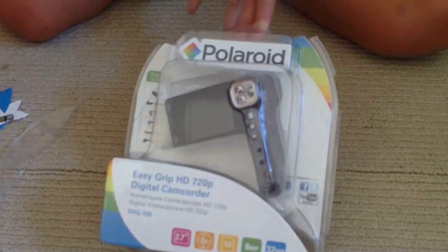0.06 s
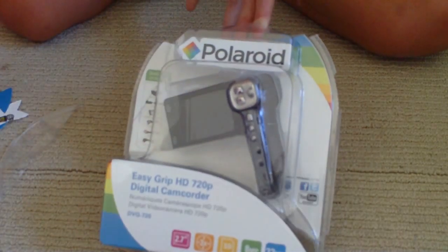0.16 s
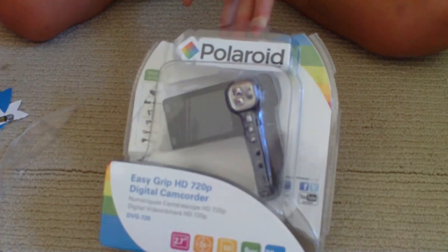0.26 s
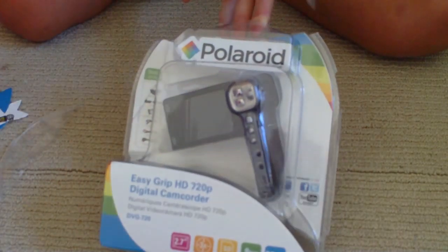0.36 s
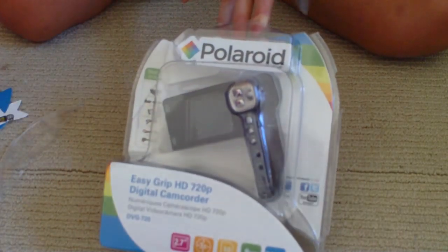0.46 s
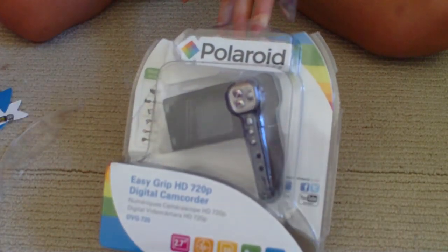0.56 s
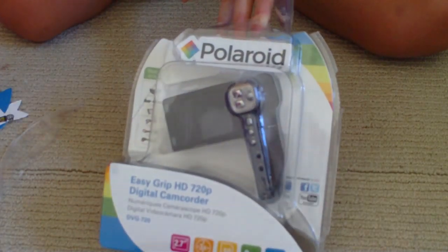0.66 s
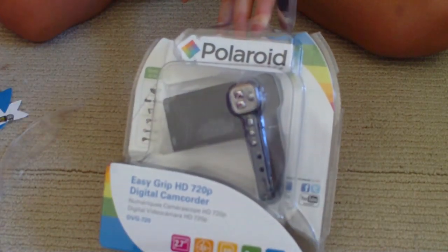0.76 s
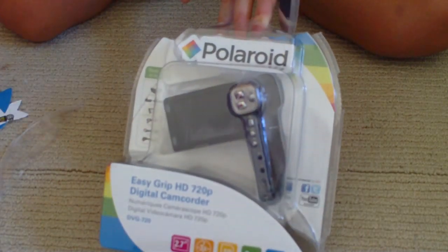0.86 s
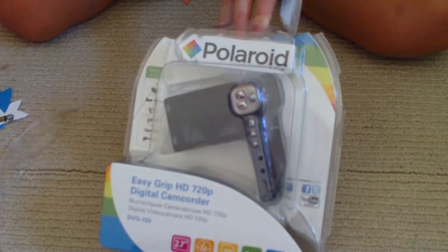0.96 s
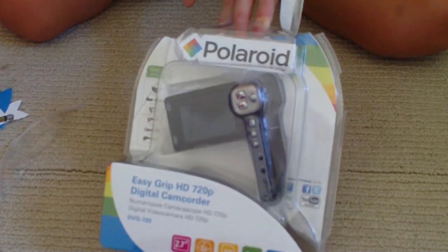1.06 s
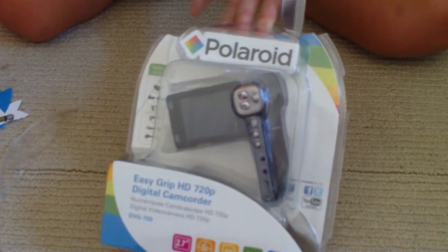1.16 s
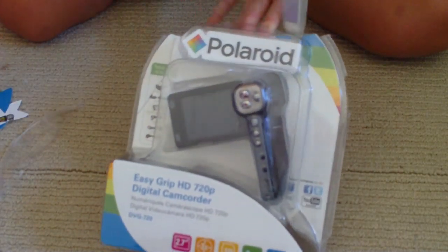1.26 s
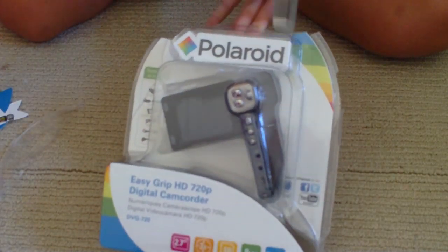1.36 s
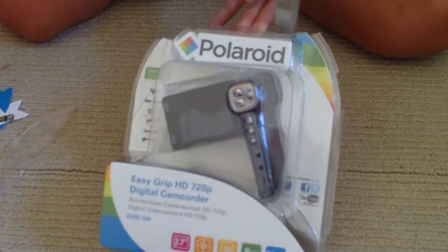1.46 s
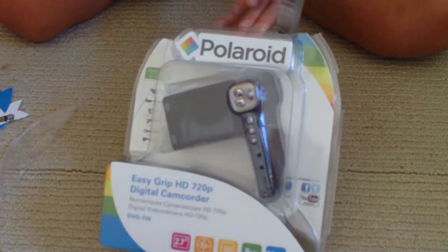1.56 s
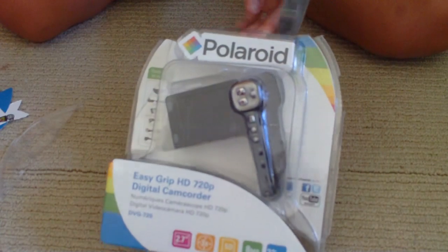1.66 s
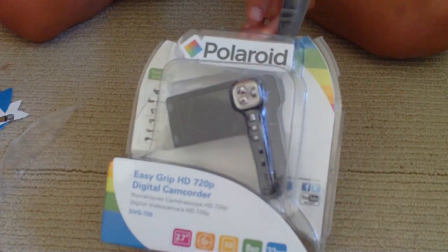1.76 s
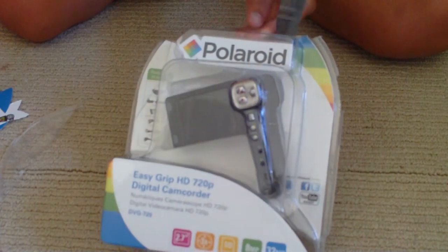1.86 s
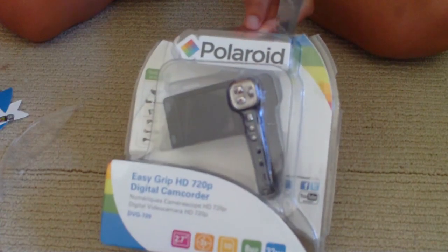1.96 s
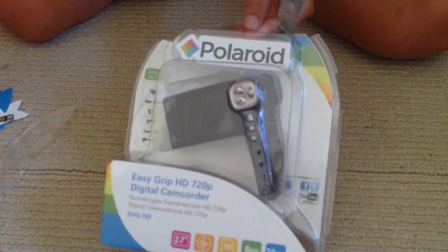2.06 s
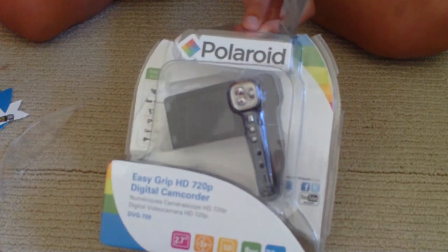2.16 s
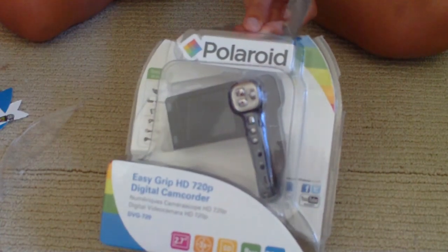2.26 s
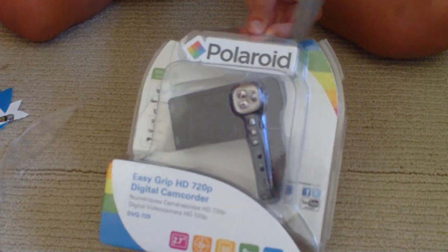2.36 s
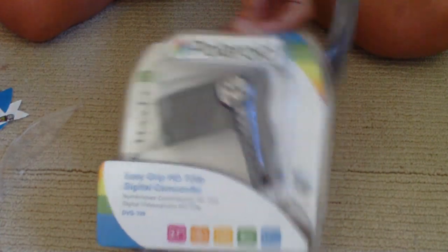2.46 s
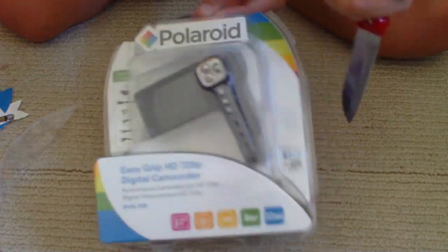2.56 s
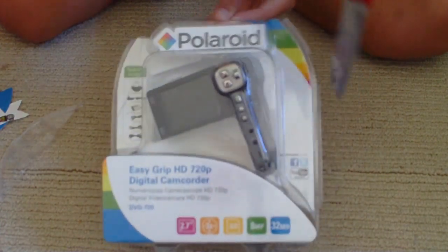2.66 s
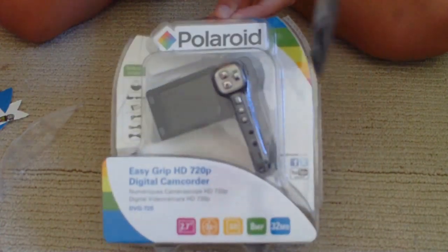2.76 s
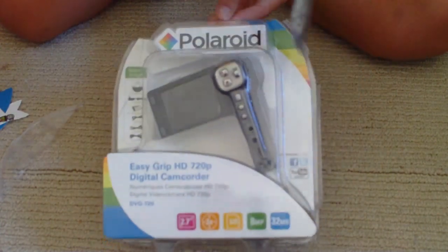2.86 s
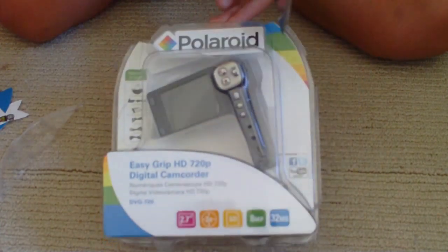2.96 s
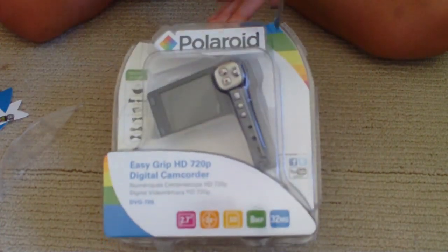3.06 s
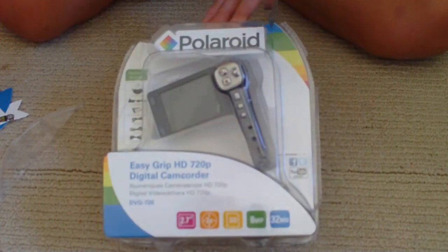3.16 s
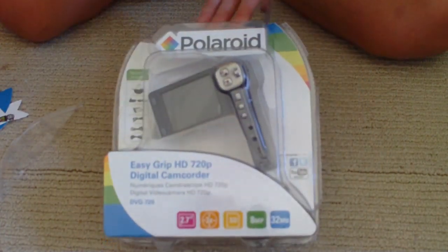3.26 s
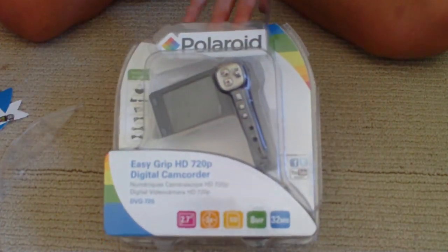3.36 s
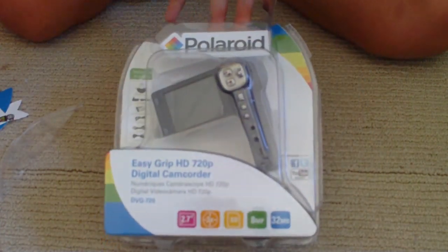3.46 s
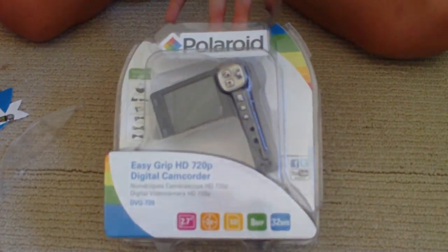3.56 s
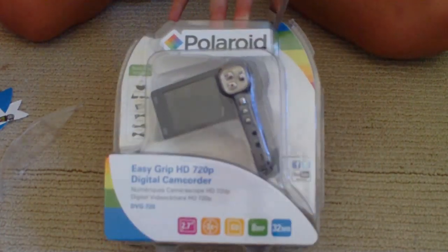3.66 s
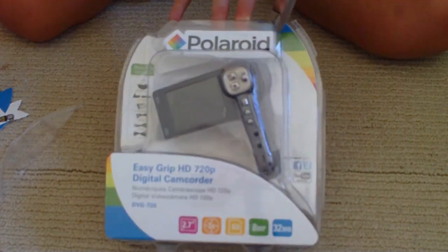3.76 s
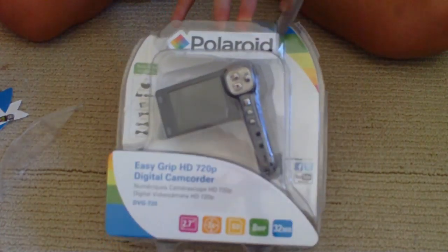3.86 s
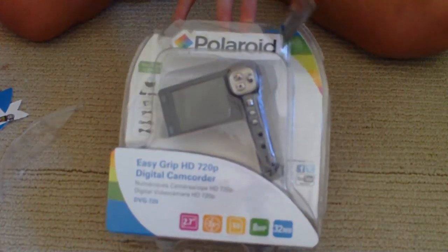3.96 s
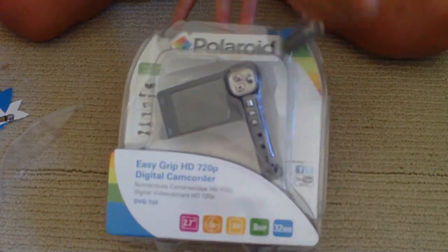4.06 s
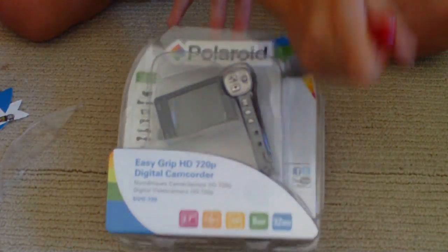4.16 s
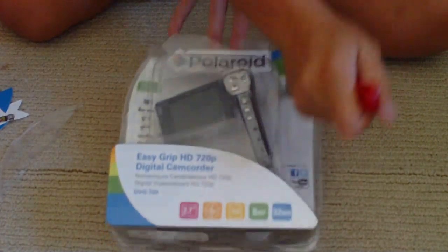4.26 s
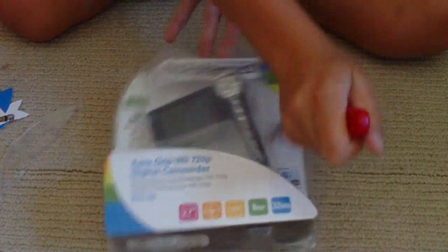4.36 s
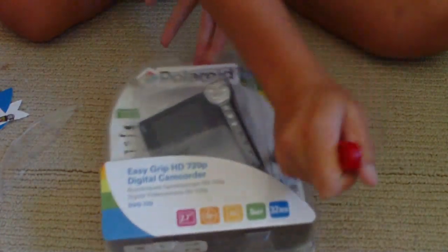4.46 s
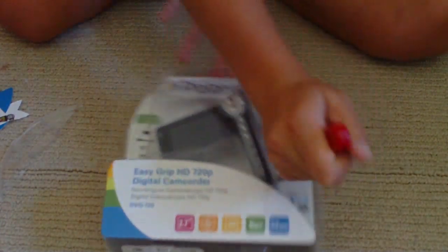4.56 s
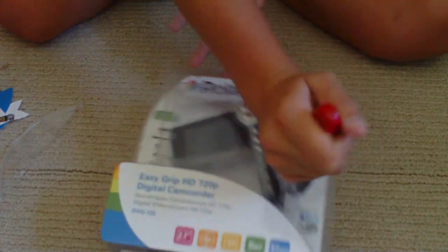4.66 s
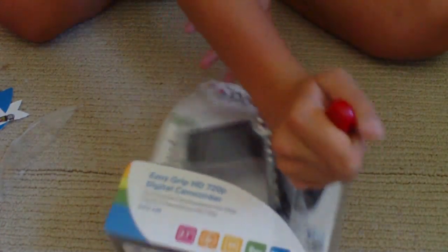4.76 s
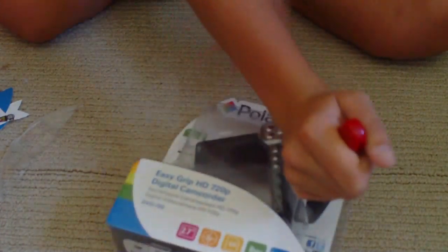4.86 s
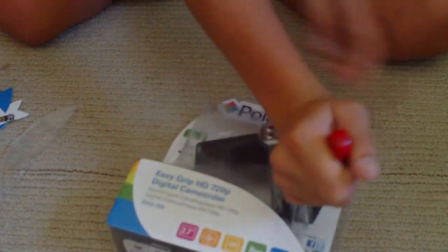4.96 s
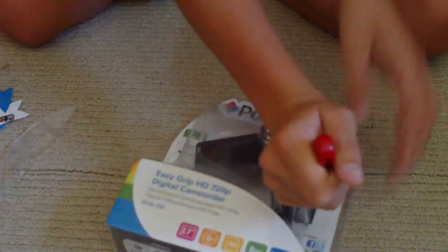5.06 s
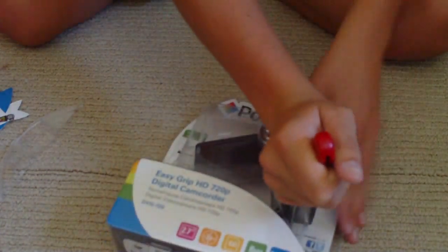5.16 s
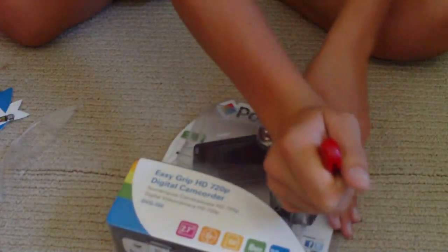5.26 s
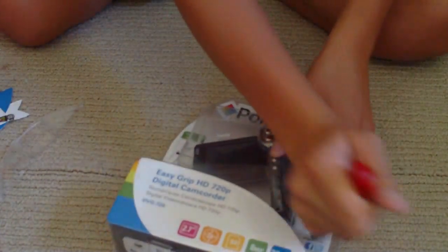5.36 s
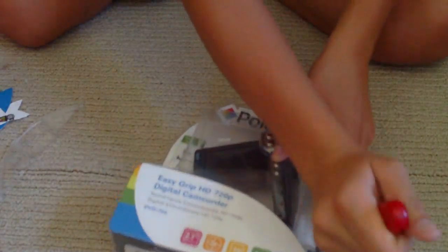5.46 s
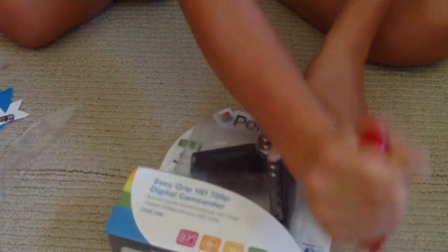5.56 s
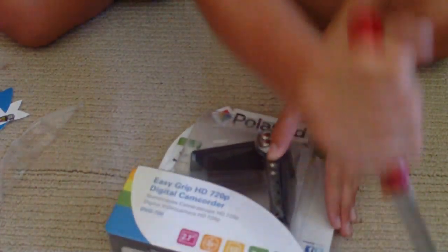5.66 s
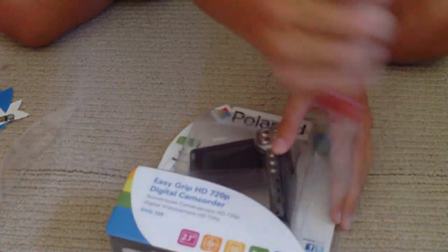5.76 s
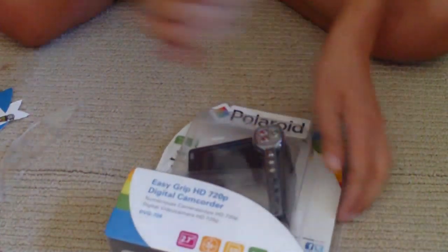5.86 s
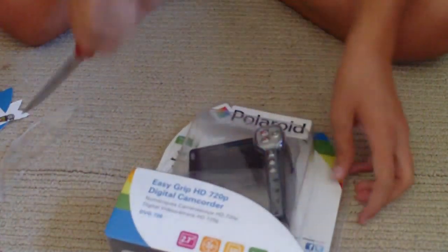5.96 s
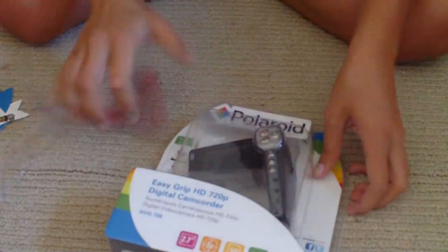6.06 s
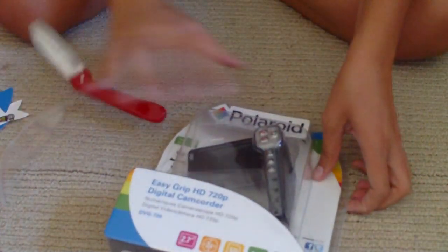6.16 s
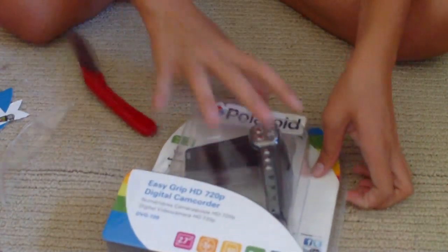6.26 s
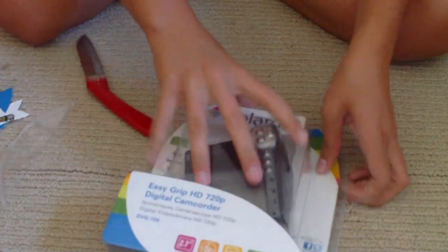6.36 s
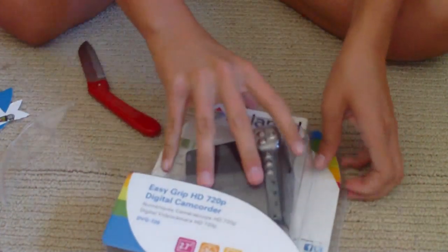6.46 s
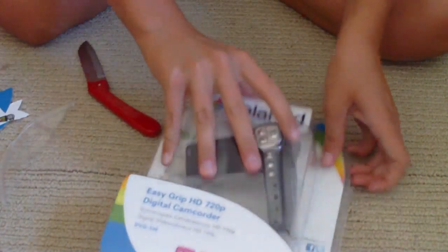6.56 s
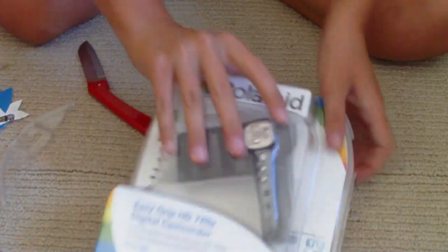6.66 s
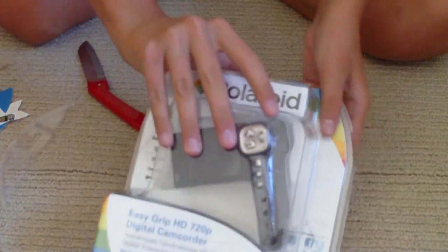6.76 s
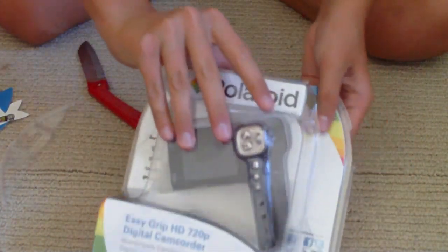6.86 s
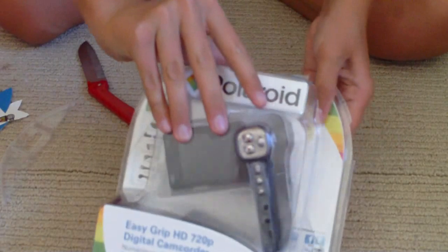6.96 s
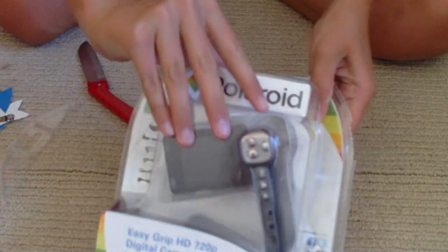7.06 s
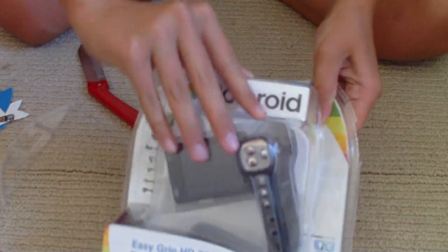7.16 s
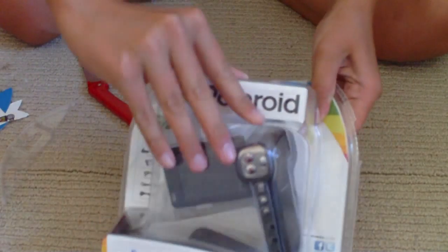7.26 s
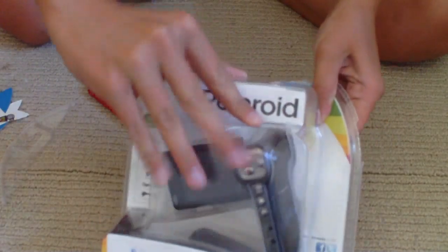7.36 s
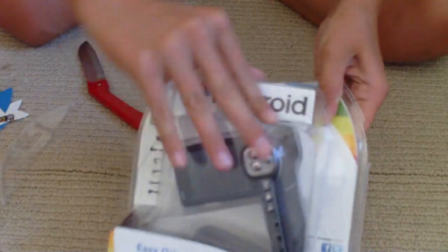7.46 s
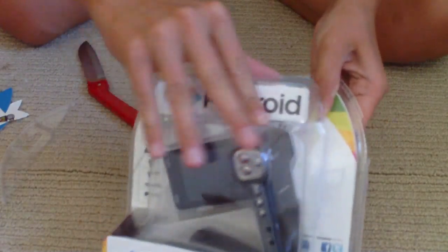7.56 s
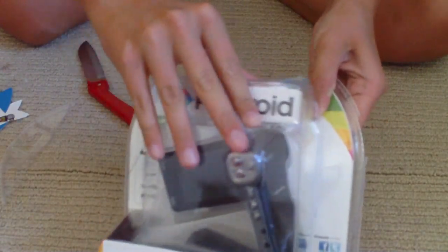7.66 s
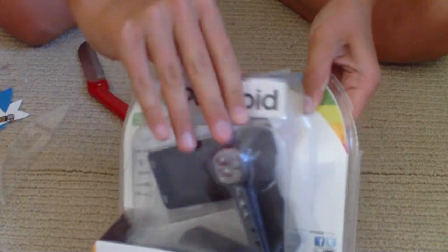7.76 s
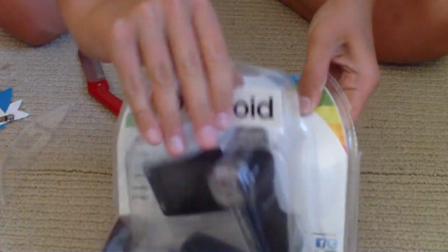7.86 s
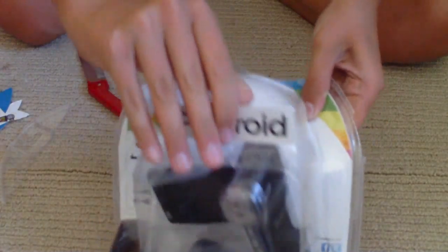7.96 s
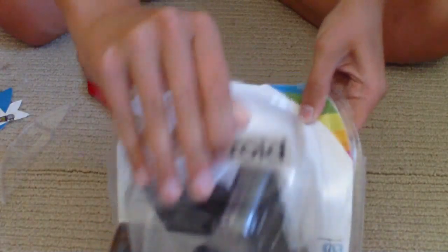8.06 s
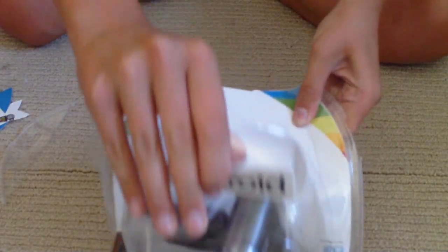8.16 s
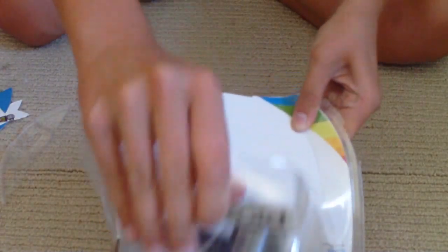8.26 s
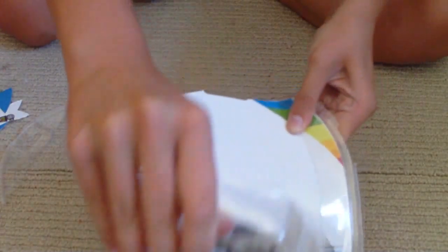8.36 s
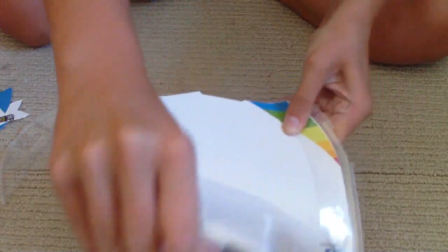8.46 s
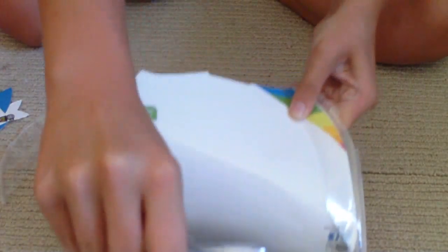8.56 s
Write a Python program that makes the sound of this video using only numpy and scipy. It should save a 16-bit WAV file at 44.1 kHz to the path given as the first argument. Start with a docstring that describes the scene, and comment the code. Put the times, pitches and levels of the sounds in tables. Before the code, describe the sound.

Over faint hiss, fingers rub and tick on a stiff plastic shell. A cluster of loud hollow snaps breaks out, then quiet; a knife rasps and one very hard crack follows. Smaller clicks and crinkles continue, thickening into a crowded run of sharp snaps as the pack is pulled open. Dull carpet thuds sit underneath. Small room, close microphone, slightly overloaded on the loudest hits.

```python
"""Hands rub and tick over stiff plastic above faint hiss; then the blister pack buckles in uneven snaps. Folds
are shaped noise bursts plus ringing shell modes; rubbing and creaks are stick-slip noise. Carpet thuds are low
noise bursts, popping panels single decaying notes; from 4 s knife and cut edges rasp. A small room answers
folds and friction; the loudest snaps flatten at full level."""
import sys
import numpy as np
from scipy import signal
from scipy.fft import rfft, irfft, next_fast_len
from scipy.io import wavfile

SR = 44100
rng = np.random.default_rng(int(sys.argv[2]) if len(sys.argv) > 2 else 0)


def wav_record(signal):
    """Record a signal, one row per channel, as 16-bit PCM in the file named by sys.argv[1]."""
    frames = np.transpose(np.atleast_2d(signal))
    bounded = np.clip(frames, -1, 1)
    # unit amplitude maps onto the largest positive 16-bit level
    quanta = np.round(bounded * 32767).astype(np.int16)
    wavfile.write(sys.argv[1], SR, quanta)


N = 379260
TIME = np.arange(N) / SR
AGE = np.arange(SR // 3) / SR  # time since a blow [s]
SHORT = SR // 50  # 20 ms in samples


def amp(db):
    """Decibels to gain."""
    return 10 ** (np.asarray(db) / 20)


def unit(x):
    """x at rms 1."""
    return x / np.sqrt(np.mean(x ** 2) + 1e-20)


def along(points, hz):
    """(frequency [Hz], value) points read on a log axis."""
    f, v = np.transpose(points)
    return np.interp(np.log(hz + 1), np.log(f + 1), v)


def level(rows):
    """A gain for every sample from (time [s], level [dB]) rows."""
    return amp(np.interp(TIME, *np.transpose(rows)))


def fade(t60_s, t=AGE):
    """Exponential decay, 60 dB down at t60_s."""
    return np.exp(-np.log(1000) * t / np.maximum(t60_s, 1e-3))


def add(track, s, sound):
    """Mix a sound into the track at s seconds."""
    room_left = track[max(round(s * SR), 0):][:len(sound)]
    room_left += sound[:len(room_left)]


def coloured(x, points, size=4096):
    """Minimum-phase filter with the gain of (frequency [Hz], gain [dB]) points."""
    gain = amp(along(points, np.fft.rfftfreq(size, 1 / SR)))
    cepstrum = irfft(np.log(gain))
    cepstrum[1:size // 2] *= 2  # fold to the causal half
    cepstrum[size // 2 + 1:] = 0
    impulse = irfft(np.exp(rfft(cepstrum)))
    return signal.fftconvolve(x, impulse)[:len(x)]


def around(x, hz, ratio=np.sqrt(2)):
    """Band-pass from hz / ratio to hz * ratio; one octave by default."""
    sections = signal.butter(2, [hz / ratio, hz * ratio], "band", fs=SR, output="sos")
    return signal.sosfilt(sections, x)


def stick_slip(slips_per_s, spread_db, grain_t60_s):
    """Tiny slips at random moments and of uneven size, each a short noise burst."""
    sizes = amp(spread_db * np.minimum(rng.standard_normal(N), 2))
    slips = (rng.random(N) < slips_per_s / SR) * sizes
    power = signal.fftconvolve(slips ** 2, fade(grain_t60_s) ** 2)[:N]
    return np.sqrt(np.abs(power)) * rng.standard_normal(N)


# room decay: (frequency [Hz], t60 [s])
ROOM_DECAY = [(150, 0.22), (400, 0.24), (1000, 0.18), (3000, 0.19), (10000, 0.2)]


def reverberate(x, wet_db, buildup_s=0.0038):
    """x plus a fresh random room tail whose decay time depends on frequency."""
    hz, t, z = signal.stft(rng.standard_normal(len(AGE)), SR, nperseg=256)
    decay = fade(along(ROOM_DECAY, hz)[:, None], t)
    tail = signal.istft(z * decay, SR, nperseg=256)[1][:len(AGE)]
    tail *= 1 - np.exp(-(AGE / buildup_s) ** 2)
    return x + amp(wet_db) * signal.fftconvolve(x, tail / np.linalg.norm(tail))[:len(x)]


# background: (time [s], level [dB])
HISS_LEVEL = [(0, -58), (2.3, -53), (2.8, -59), (4.6, -57.5), (5.05, -60), (8.6, -55)]
# its spectrum: (frequency [Hz], gain [dB])
HISS_COLOUR = [(15, -23), (25, -12), (107, -9.5), (173, -9.5), (254, -4.5), (401, -10.5), (518, -2),
               (559, -4.5), (1110, -9.5), (1670, -9.5), (3000, -12.5), (7700, -11), (11000, -17),
               (14300, -26), (22000, -120)]


def background():
    """Room tone and microphone hiss: coloured noise, slowly swelling and sinking."""
    return level(HISS_LEVEL) * unit(coloured(rng.standard_normal(N), HISS_COLOUR))


# hands shifting on the shell, before trim: (time [s], level [dB])
RUB_LEVEL = [(0, -59), (0.95, -56), (1.3, -46), (1.8, -56), (2.33, -68), (2.56, -42.5), (2.75, -63),
             (3.55, -57.5), (3.95, -57), (4.3, -42.5), (4.74, -41), (5.0, -61.5), (5.3, -53), (5.53, -39.5),
             (5.68, -53.5), (6.2, -57), (6.38, -42), (6.75, -45.5), (7.1, -44.5), (7.4, -41.5), (7.75, -43),
             (8.25, -44), (8.6, -44)]
# its spectrum: (frequency [Hz], gain [dB])
RUB_COLOUR = [(60, -28.5), (200, -6), (380, 2), (520, 0), (750, -4), (1400, -2.5), (2100, -12),
              (3200, -13.5), (5000, -40)]


def hand_rub(trim_db=-3, wet_db=-3):
    """Hands rub over the shell in dense stick-slip."""
    slips = stick_slip(slips_per_s=260, spread_db=4, grain_t60_s=.014)
    rub = level(RUB_LEVEL) * unit(coloured(slips, RUB_COLOUR))
    return reverberate(amp(trim_db) * rub, wet_db)


# fingertips stutter over the plastic, the knife chatters, the shell drags on the carpet:
# (start [s], end [s], mean slip rate [1/s], band centre [Hz], dry level [dB])
CREAKS = [(0, 0.045, 160, 1110, -50.5), (0.139, 0.44, 45, 1330, -59), (1.188, 1.49, 113, 377, -50),
          (1.241, 1.416, 150, 1490, -55), (2.422, 2.447, 400, 3100, -26), (2.537, 2.659, 170, 465, -53.5),
          (3.34, 3.453, 170, 806, -53), (3.662, 3.716, 220, 700, -51), (4.1, 4.17, 130, 1000, -43),
          (4.345, 4.418, 500, 7500, -47.5), (6.072, 6.101, 350, 2800, -28), (6.454, 6.5, 56, 5900, -48.5),
          (6.543, 6.562, 240, 3270, -39), (6.592, 6.605, 370, 5200, -41.5), (7.484, 7.54, 75, 1160, -41.5)]


def creaks(slip_t60_s=0.028, wet_db=-5):
    """The plastic sticks and lets go at an uneven rate, each slip a tick in the facet's octave."""
    out = np.zeros(N)
    for start, end, rate, hz, db in CREAKS:
        stroke = np.zeros(len(AGE))
        moments = np.cumsum(rng.uniform(.5, 1.5, size=48)) / rate
        for late in moments:
            slip = amp(rng.normal(0, 3)) * fade(slip_t60_s)[:SHORT] * rng.standard_normal(SHORT)
            add(stroke, late, slip * (late < end - start))
        stroke = unit(around(stroke, hz))
        # level refers to the stroke's own duration
        add(out, start, amp(db) * stroke * np.sqrt(abs(end - start) / AGE[-1]))
    return reverberate(out, wet_db)


# shell resonances, nominal: (frequency [Hz], level [dB], t60 [s])
SHELL_MODES = [(398, -7, .2), (505, -1, .15), (610, -7, .08), (802, -3, .1), (961, -3, .1), (1122, -1, .12),
               (1285, -2, .18), (1460, -3, .1), (1934, -7, .09), (2965, -6, .06), (3235, -7, .06)]
# mean spectrum of a fresh crease: (frequency [Hz], gain [dB])
CREASE_COLOUR = [(60, -24.5), (200, -5), (330, 1), (500, 10), (660, 6.5), (900, 9), (1350, 8.5),
                 (1800, 5.5), (2400, -1.5), (3100, 2.5), (4200, -1.5), (8000, 5.5), (11000, -4)]


def buckle(facet_hz, rise_s, t60_s, click_db=7, burst_s=0.0043, ring_db=-24.5, facet_db=-7.5, facet_t60_s=.055):
    """A crease flips: fracture burst, flutter of dense sheet modes, the facet's note, the shell's ring."""
    fracture = amp(click_db) * np.exp(-(AGE / burst_s) ** 2)  # holds while the crease runs, then stops
    flutter = rng.standard_normal(len(AGE)) * (fade(t60_s) + fracture)
    facet = fade(facet_t60_s) * np.sin(2 * np.pi * facet_hz * AGE)
    hz, db, life_s = np.transpose(SHELL_MODES)[:, :, None]
    # every grip bends the shell differently and shifts its modes a little
    strength, bend, phase = rng.standard_normal((3, len(SHELL_MODES), 1))
    tones = np.sin(2 * np.pi * (hz * (1 + .02 * bend) * AGE + phase))
    ring = (amp(db + 3 * strength) * fade(life_s) * tones).sum(axis=0)
    # a soft fold gathers over several milliseconds, a brittle one at once
    swell = 1 - np.exp(-AGE / max(rise_s, 1e-4))
    own_colour = [(f, gain + rng.standard_normal()) for f, gain in CREASE_COLOUR]
    return coloured(swell * (flutter + amp(ring_db) * ring + amp(facet_db) * facet), own_colour)


# big folds break clean, middling ones flutter on: (sheet level [dB], t60 [s])
FLUTTER_DECAY = [(-50, .045), (-18.5, 0.041), (-5, 0.011)]
# where each part of a snap sounds
BODY_HZ, SHEET_HZ, EDGE_HZ, CRACK_HZ = (255, 700), (700, 2400), (2650, 4300), (4500, 20000)
PARTS = [signal.butter(3, band, "band", fs=SR, output="sos") for band in (BODY_HZ, SHEET_HZ, EDGE_HZ, CRACK_HZ)]
EDGE_DB, EDGE_FOLLOWS = -3, 0.68  # stiff edge against the sheet; share of the crack's dB it follows
RISE_S, SOFTENING = 0.00051, 0.91  # rise when crack equals sheet; dB of slowing per dB of weaker crack
REBOUND_S, REBOUND_DB = .0055, -6.5  # mean delay; level against the first crack
REBOUND_FROM_DB = -35  # a weaker sheet does not spring back


def fold(sheet_db, body_db, crack_db, facet_hz, wet_db=-3.5):
    """One fold gives way and, if loud, springs back; body, edge and crack are balanced against the sheet."""
    rise_s = RISE_S * amp(-SOFTENING * crack_db)
    t60_s = np.interp(sheet_db, *np.transpose(FLUTTER_DECAY))
    snap = reverberate(buckle(facet_hz, rise_s, t60_s), wet_db)
    if sheet_db > REBOUND_FROM_DB:
        late = rng.uniform(.5, 1.5)
        rebound = reverberate(buckle(facet_hz, rise_s, t60_s), wet_db)
        add(snap, late * REBOUND_S, amp(REBOUND_DB) * rebound)
    out = np.zeros(len(AGE))
    edge_db = EDGE_DB + EDGE_FOLLOWS * crack_db
    for band, part_db in zip(PARTS, (body_db, 0, edge_db, crack_db)):
        part = signal.sosfilt(band, snap)
        attack_rms = np.std(part[:SHORT])
        out += amp(sheet_db + part_db) * part / attack_rms
    return out


TICK_DB, TICK_SPREAD_DB = -1.5, -1.5  # against the rub table; scatter
TICK_BODY_DB, TICK_CRACK_DB, TICK_HZ = -2, -11, 1175  # body, mean crack against sheet; middle facet pitch


def ticks(count=26):
    """Small folds flip at random, louder the harder the hands work."""
    out = np.zeros(N)
    moments = (np.arange(count) + rng.random(count)) * TIME[-1] / count
    for s, (size, brittle, pitch) in zip(moments, rng.uniform(-1.01, 1, (count, 3))):
        sheet_db = np.interp(s, *np.transpose(RUB_LEVEL)) + TICK_DB + TICK_SPREAD_DB * size
        facet_hz = TICK_HZ * 2 ** (pitch / 2)
        add(out, s, fold(sheet_db, TICK_BODY_DB, TICK_CRACK_DB + 6 * brittle, facet_hz))
    return out


# snaps and knocks of pack and knife, before trim: (time [s], flexing sheet level [dB],
# hollow body against sheet [dB], crack against sheet [dB], pitch of the flipping facet [Hz])
SNAPS = [(0.677, -48.5, 2, -27, 1030), (0.7243, -43, 3, -23, 1030), (1.1649, -33, -3, -14, 1144),
         (1.2462, -45, 0, -7, 940), (1.512, -37, -15, -20, 1190), (1.6761, -38, -2, -11, 768),
         (2.0905, -61.5, 13.5, -7, 810), (2.3615, -16, -0.5, -15.5, 906), (2.4181, -14.5, -8, -6.5, 1450),
         (2.4446, -20, -0.5, -8, 813), (2.5222, -43.5, -14, 3, 770), (3.1191, -55, 2.5, -1, 883),
         (3.2814, -58.5, 11.5, -22, 830), (3.5673, -38, -1.5, -10.5, 780), (3.6592, -43.5, 2, -11.5, 880.0),
         (4.0513, -27.5, -3.5, -24, 1350), (4.1519, -45.5, 5.5, -6, 770), (4.352, -35, 1, -15, 954),
         (4.3748, -29.5, -5, -14.5, 854), (4.445, -29.5, -5, -26, 787), (4.5454, -43, 0, 6.5, 1450),
         (4.5801, -50.5, -17, 11, 1430.0), (4.629, -39.5, 2.5, 1, 1030), (4.7675, -10, -5.5, -7, 1369),
         (5.165, -44.5, 2.5, -18, 890), (5.356, -41.5, 4.5, -15, 860), (5.446, -28, -27, -14.5, 1125),
         (5.5586, -27.0, 0, -7.5, 1478), (5.789, -45, 1, -12, 1330), (6.0392, -44.5, 5.5, -22, 1370),
         (6.068, -29, -18, 0, 1430), (6.0813, -35.5, -21, -2.5, 1930), (6.109, -33.5, 5, 1.5, 790),
         (6.3037, -43.0, 3, -3, 1040.0), (6.3357, -32, -3, -18.5, 1420), (6.3962, -29.5, -7, 1.5, 1406),
         (6.482, -45, -8, -10, 1610), (6.547, -40, -16, -5.5, 1420.0), (6.606, -34.5, 1, -18, 1530),
         (6.816, -36, -3.5, -22, 904), (6.8564, -20, -4, -15, 1260), (7.1142, -38.5, -10, -5.5, 1495),
         (7.1792, -34.5, -5.5, -5, 1630), (7.2494, -31.5, -9, -36, 1457), (7.343, -22, -2.5, -10.5, 968),
         (7.413, -24.0, -7.5, -8.5, 1570), (7.4566, -33.5, 2.5, -8, 1370.0), (7.6104, -43.0, 9.5, -15, 984),
         (7.8116, -37, -4, -19, 863), (7.8327, -19, -22.5, -14, 1478), (7.842, -13.0, -2.5, -3.5, 1472),
         (7.9185, -14, -7, -5.5, 1152), (7.932, -34.5, -15, 10.5, 1090), (7.9974, -25, -16.5, 0.5, 1940.0),
         (8.0683, -16.5, -2, 4.5, 1570), (8.2453, -40.5, -17, 7.5, 920), (8.3792, -17, -13.5, 4.5, 1048),
         (8.488, -22, -7.5, -13, 1053)]


def snaps(sheet_trim_db=1.0, body_trim_db=-1.5, crack_trim_db=-0.38):
    """The shell buckles as it is pried, cut and pulled open."""
    out = np.zeros(N)
    for s, sheet_db, body_db, crack_db, facet_hz in SNAPS:
        snap = fold(sheet_db + sheet_trim_db, body_db + body_trim_db, crack_db + crack_trim_db, facet_hz)
        add(out, s, snap)
    return out


# the hand presses the pack into the carpet: (time [s], band centre [Hz], peak level [dB])
BUMPS = [(.868, 68.5, -44), (1.163, 108, -32.5), (4.766, 70.2, -35), (6.857, 167, -35), (7.613, 150.7, -47)]
THUD_HZ, THUD_DB, THUD_GIVE = 136, -30.5, 0.5  # peak under a 0 dB body; dB per dB of body
THUD_FROM_DB = -42  # a weaker body does not move the pack


def bumps(t60_s=0.094):
    """The carpet thuds under pushes and snaps; it yields, so big snaps thud only a little more."""
    blows = list(BUMPS)
    for s, sheet_db, body_db, _, _ in SNAPS:
        if sheet_db + body_db > THUD_FROM_DB:
            blows.append((s, THUD_HZ, THUD_DB + THUD_GIVE * (sheet_db + body_db)))
    out = np.zeros(N)
    for s, hz, db in blows:
        thud = around(rng.standard_normal(len(AGE)) * fade(t60_s), hz)
        add(out, s, amp(db) * thud / np.abs(thud).max())
    return out


# flat panels popping through: (time [s], pitch [Hz], level [dB], t60 [s])
PANELS = [(1.166, 2250, -26, 0.045), (1.171, 1105, -30, 0.14), (1.509, 261.4, -33, 0.27),
          (2.447, 802, -7, 0.064), (2.686, 833, -40.5, 0.082), (3.12, 874, -34, 0.074),
          (4.772, 1314, -27.5, 0.32)]


def panels(rise_s=0.00055):
    """A panel that pops through rings as one decaying sine."""
    out = np.zeros(N)
    for s, hz, db, t60_s in PANELS:
        note = (1 - np.exp(-AGE / rise_s)) * fade(t60_s) * np.sin(2 * np.pi * hz * AGE)
        add(out, s, amp(db) * note)
    return out


# blade and cut edges scraping, before mix and trim: (time [s], level [dB])
SCRAPE_LEVEL = [(4, -56.5), (4.22, -56.5), (4.38, -49), (4.66, -46.5), (4.9, -70.5), (5.3, -65.5),
                (5.52, -42.5), (5.7, -66), (6.22, -56.5), (6.5, -48.5), (6.75, -58), (7.1, -55),
                (7.46, -47.5), (7.75, -56.5), (8.15, -50), (8.6, -51)]
# rasp spectrum: (frequency [Hz], gain [dB])
SCRAPE_COLOUR = [(800, -17), (1800, 7), (3200, -2), (4200, 0), (7000, 9.5), (9200, 8), (11000, -17)]
SCRAPE_START_S = SCRAPE_LEVEL[0][0]


def crinkle(count=170, grain_t60_s=0.015):
    """Tiny creases give way at random while the pack is cut and pulled, each with its own pitch."""
    out, age = np.zeros(N), AGE[:SHORT]
    for moment, pitch, size in rng.random((count, 3)):
        hz = 1200 * 6 ** pitch
        tick = around(rng.standard_normal(len(age)) * fade(grain_t60_s, age), hz, ratio=2)
        s = SCRAPE_START_S + moment * (TIME[-1] - SCRAPE_START_S)
        add(out, s, amp(14 * size ** 2) * unit(tick))
    return unit(out)


def scrape(trim_db=-1.5, wet_db=-3):
    """Blade and edges rasp in fast stick-slip, mixed with crinkling."""
    slips = stick_slip(slips_per_s=600, spread_db=4, grain_t60_s=.009)
    rasp = unit(coloured(slips, SCRAPE_COLOUR))
    cutting = level(SCRAPE_LEVEL) * (TIME > SCRAPE_START_S) * (.8 * rasp + .7 * crinkle())
    return reverberate(amp(trim_db) * cutting, wet_db)


def scene():
    """Everything at the one microphone."""
    handling = hand_rub() + creaks() + ticks()
    opening = snaps() + bumps() + panels() + scrape()
    return (background() + handling + opening)[None]


def record(dry, ceiling=1.0, notch_hz=3980, notch_half_width_hz=50, bass_hz=22, top_hz=11000):
    """The hardest snaps flatten at full level; the sound has a narrow notch and is band-limited."""
    clipped = dry / (1 + np.abs(dry / ceiling) ** 6) ** (1 / 6)
    size = next_fast_len(N + SR // 2)
    hz = np.fft.rfftfreq(size, 1 / SR)
    detuning = notch_hz ** 2 - hz ** 2
    notch = detuning / (detuning + 2j * hz * notch_half_width_hz)
    high_pass = 1j * hz / (1j * hz + bass_hz)
    low_pass = 1 / np.sqrt(1 + (hz / top_hz) ** 240)
    return irfft(rfft(clipped, size) * notch * high_pass * low_pass, size)[:, :N]


dry = scene()
out = record(dry)
wav_record(out)
```